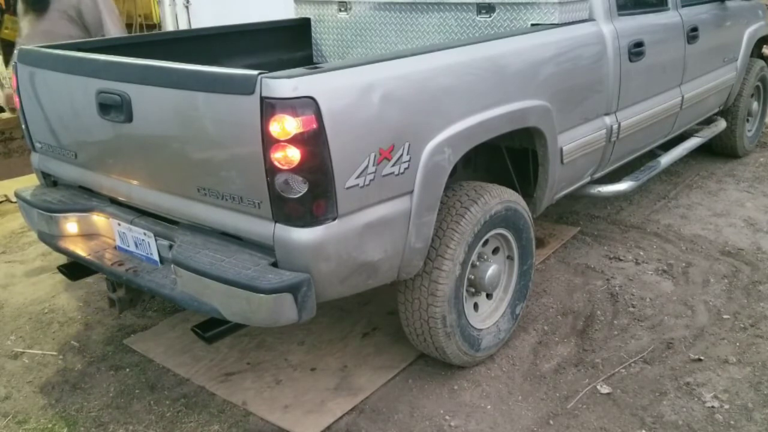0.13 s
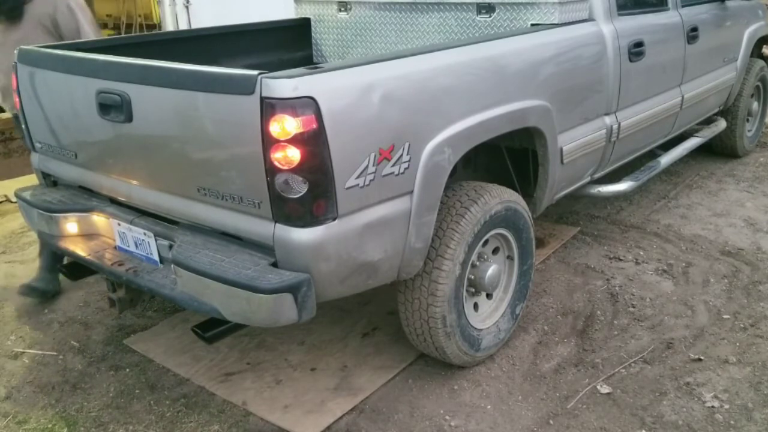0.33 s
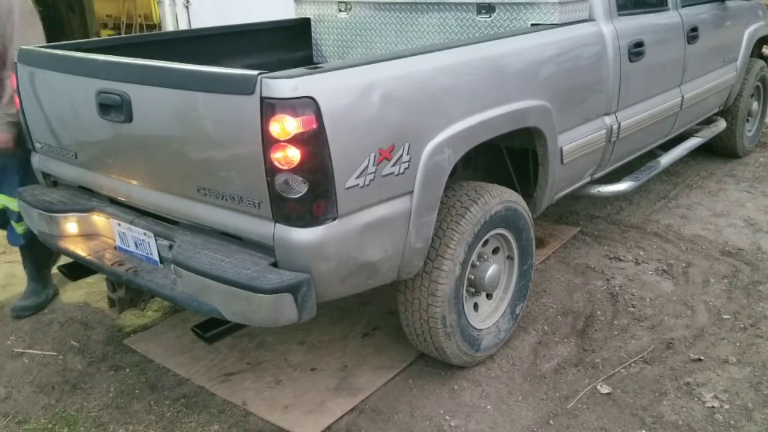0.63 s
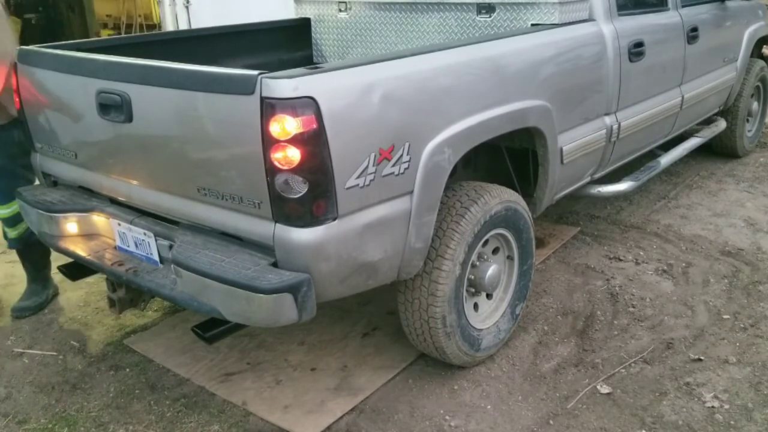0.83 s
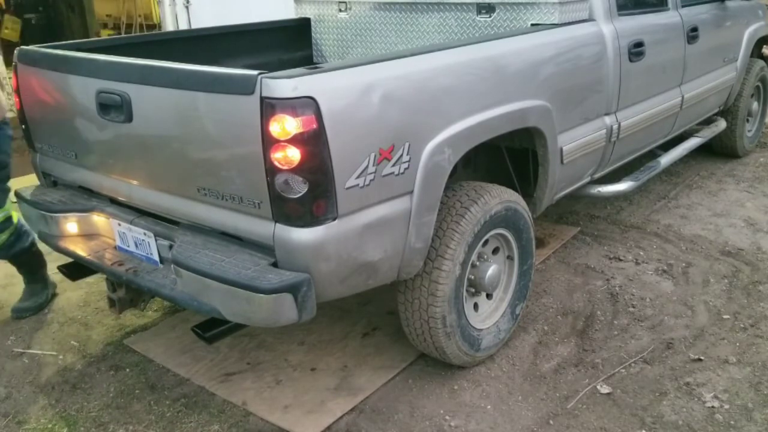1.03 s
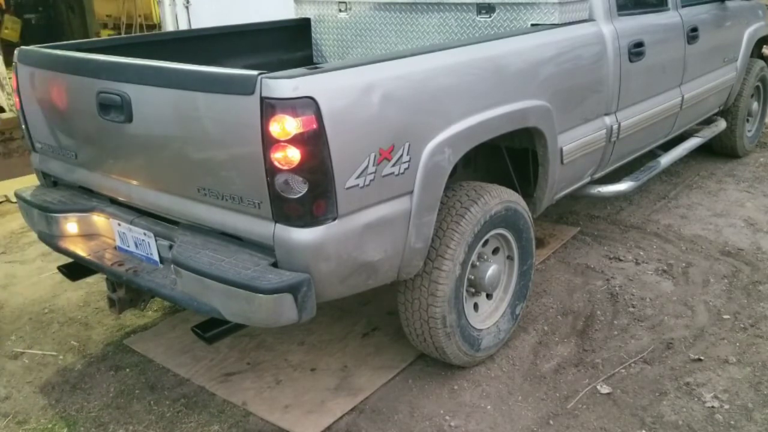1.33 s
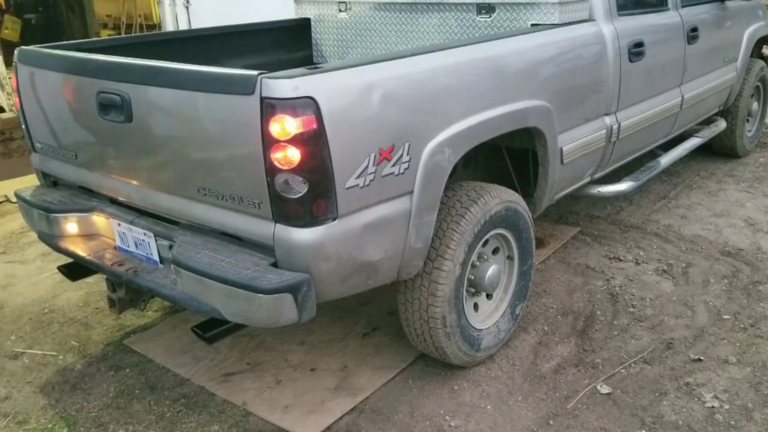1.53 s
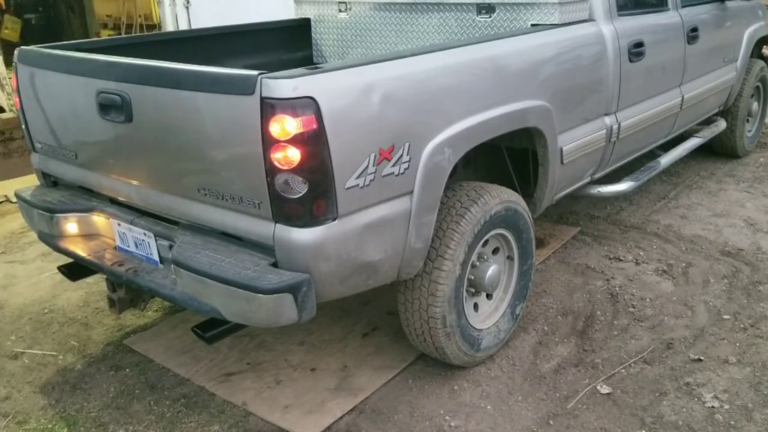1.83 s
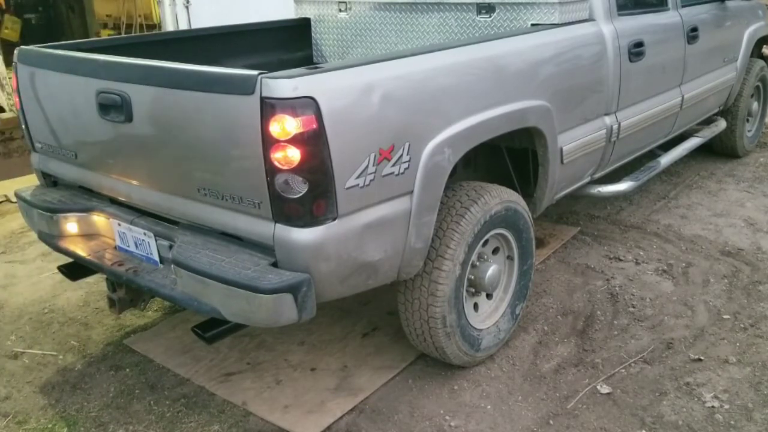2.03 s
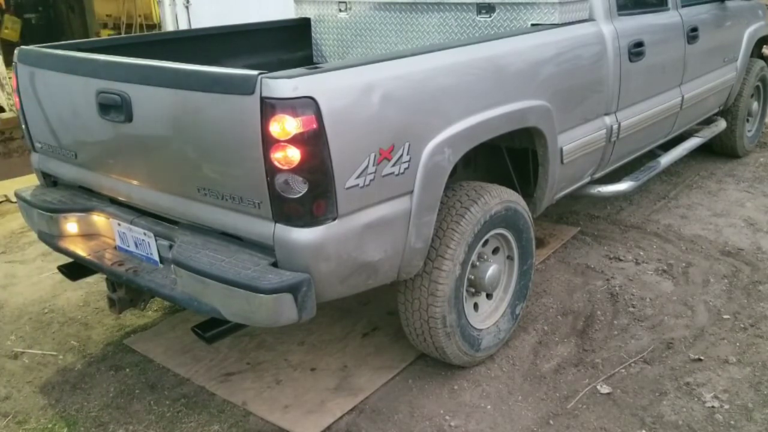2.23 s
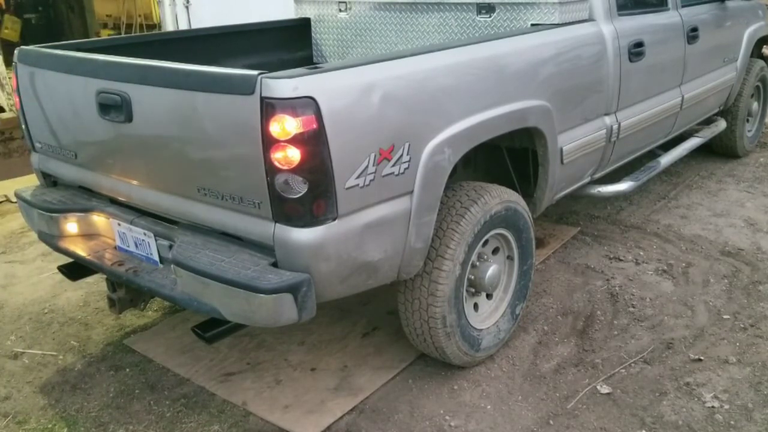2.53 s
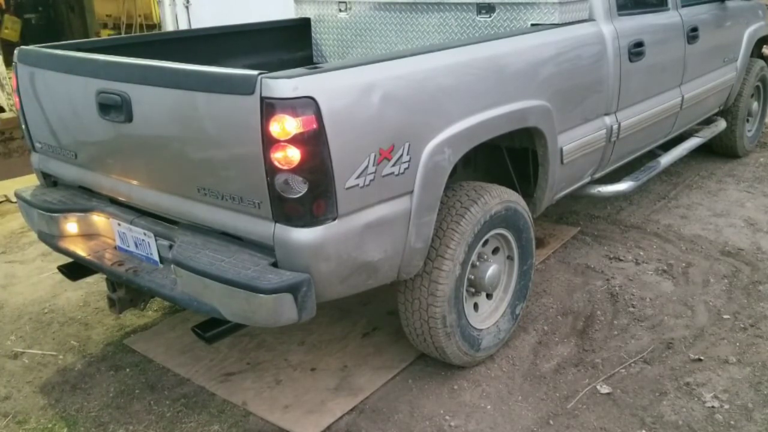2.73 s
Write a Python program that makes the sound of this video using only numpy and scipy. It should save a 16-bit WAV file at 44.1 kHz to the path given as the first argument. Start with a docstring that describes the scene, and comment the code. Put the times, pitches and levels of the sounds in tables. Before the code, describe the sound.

A big petrol pickup engine idles throughout, about 750 turns per minute, its muffled exhaust giving a deep, uneven, bass-heavy throb with soft gas puffs. Faint whir and whine sit to the right. Brief hollow hums rise near 1.4 seconds, and the boom dips momentarily at 1.85. Low air buffets come and go; close cloth rustles faintly at 1.45, then scuffs and ticks on the right around 2.1-2.3.

```python
"""A big petrol V8 idles in a pickup outdoors, heard from beside the rear wheel: uneven pulses from two
cylinder banks excite the resonances of the muffled tailpipe, and each pulse drives a puff of gas noise.
Hollow hums rise briefly from the rumble; the engine bay on the right adds throbbing noise and faint whines.
Swells of low noise are air on the microphone; grains, ticks and a scuff are cloth close by, probably a sleeve."""
import sys
import numpy as np
from scipy import signal
from scipy.fft import rfft, irfft
from scipy.io import wavfile
from scipy.ndimage import map_coordinates

SR = 44100
rng = np.random.default_rng(int(sys.argv[2]) if len(sys.argv) > 2 else 0)


def wav_record(signal):
    """Record a signal, one row per channel, as 16-bit PCM in the file named by sys.argv[1]."""
    frames = np.transpose(np.atleast_2d(signal))
    bounded = np.clip(frames, -1, 1)
    # unit amplitude maps onto the largest positive 16-bit level
    quanta = np.round(bounded * 32767).astype(np.int16)
    wavfile.write(sys.argv[1], SR, quanta)


N = 127890

# Engine speed: [t/s, speed/(rev/min)]
ENGINE_SPEED = [(0, 749), (1.65, 749), (1.8, 746.4), (2.9, 746.4)]
# Bank of each cylinder in firing order: [0 short pipe, 1 long pipe]
CYLINDER_BANK = [0, 1, 0, 1, 1, 0, 1, 0]
# Relative pulse strength of each cylinder in firing order: [level/dB]
CYLINDER_LEVEL = [9.6, 8.1, -8.1, 2.1, -1.3, -2.4, 4.7, -12.7]
# Relative response of muffler and tailpipe: [f/Hz, level/dB]
PIPE_RESPONSE = [(20, -27), (31, -22), (42, -26.4), (50, -.6), (60, -6.2), (68.5, 10.9), (75, -.3),
                 (82, -9.4), (92, -18), (100, 0), (112, -26), (131, -21), (155, -19), (185, -26),
                 (200, -32.9), (213, -10), (238, -38.5), (268, -26), (300, -41), (500, -52), (1000, -72),
                 (3000, -130)]
# Gas noise at the pipe's mouth, before its modulation and swell: [f/Hz, level/(dB per Hz)]
GAS_SPECTRUM = [(18, -76), (35, -62), (52, -61), (72, -65.5), (90, -54), (130, -66), (158, -60.5),
                (185, -76), (213, -59.5), (236, -72.5), (268, -64.5), (305, -69.5), (520, -78),
                (1000, -98.5), (2500, -125)]
# Slow changes of level: [t/s, gas level/dB, engine bay level/dB]
SLOW_SWELL = [(0, -6.5, -0.6), (.25, 1.5, 0), (.45, -3, -1.1), (.7, -0.5, 0.05), (1.1, -.5, 0),
              (1.4, -3.5, .5), (1.7, 1.5, 0), (1.9, 2.5, 0.5), (2.1, 3, -1), (2.35, -3, -0.76),
              (2.7, 1, -0.9), (2.9, 1.5, -1)]
# Hollow hums, level at the peak on the right: [t/s, length/s, f/Hz, level/dB]
HOLLOW_HUMS = [(1.35, .05, 160, -34), (1.421, 0.036, 152, -33)]
# Fan, belts and valve gear before modulation: [f/Hz, left level/(dB per Hz), right level/(dB per Hz)]
BAY_SPECTRUM = [(20, -93.5, -89.5), (62.5, -45, -47.5), (160, -77.5, -67.5), (292, -93, -82),
                (520, -83.5, -73), (925, -83, -72.5), (1610, -97.5, -78.5), (2210, -105, -85),
                (2970, -121, -88.5), (4890, -124, -98), (6370, -130, -97), (8270, -132, -108),
                (10200, -126, -109), (13000, -115, -103), (15400, -116, -108)]
# Moments when the random flutter of the whir's noise happens to be louder: [t/s]
LOUDER_MOMENTS = [.255, .48, .675, 1.32, 1.77, 2.285]
# Whine of pulleys and pumps on the right, before the swell: [f/Hz, level/dB]
PULLEY_WHINES = [(437, -57), (513, -58.5), (2738, -72), (3070, -76)]
# Air on the microphone, level at each peak: [t/s, length/s, left level/dB, right level/dB]
AIR_BUFFETS = [(.375, .012, -50, -28), (1.39, .08, -42, -33), (1.56, .05, -35, -36),
               (1.875, .025, -34, -30), (1.95, .06, -35, -31), (2.13, .08, -35, -31), (2.45, .02, -50, -32),
               (2.66, .06, -42, -34)]
# Relative spectrum of the buffets: [f/Hz, level/dB]
AIR_SPECTRUM = [(20, -67), (60, 6.5), (110, 5.5), (155, 0.5), (185, -12.5), (270, -15), (600, -26),
                (2000, -87), (5000, -110)]
# Level of the rustle before its colouring: [t/s, level/dB]
RUSTLE_LEVEL = [(0, -86), (1.42, -73), (1.455, -50), (1.53, -73), (2.0, -60), (2.04, -47), (2.09, -44.5),
                (2.105, -40.5), (2.14, -40.5), (2.17, -44), (2.21, -48), (2.27, -46.5), (2.33, -59),
                (2.6, -60), (2.7, -50.5), (2.9, -56.5)]
# Filter of the rustle: [f/Hz, left level/dB, right level/dB]
CLOTH_RESPONSE = [(102, 7, 2.5), (253, -7, 8.5), (694, 3, 1), (1490, -11.5, -6), (2970, -41, -7),
                  (5650, -41, -6), (8540, -43, -8.5), (10200, -25, -11), (12200, -22, -4),
                  (15500, -21, -10)]
# Ticks in the cloth, level at onset on the right: [t/s, level/dB, centre f/Hz]
CLOTH_TICKS = [(.1252, -45, 12000), (2.035, -45, 6000), (2.1005, -38, 9000), (2.1037, -35, 12500),
               (2.126, -37, 10000), (2.1355, -39, 7000), (2.1475, -33, 11000), (2.177, -36, 7500),
               (2.194, -44, 12500), (2.2695, -45, 12500), (2.281, -48, 12500), (2.5112, -47, 12000)]
# Relative spectrum of the scuff: [f/Hz, level/dB]
SCUFF_SPECTRUM = [(100, 2), (300, -5), (800, 1.5), (1500, -14), (4000, -23), (9000, -57)]

# Exhaust pulses: timing in s, random spread of strength in dB
FIRST_FIRING_S, BANK_LAG_S, JITTER_S, SCATTER_DB = .0053, .0048, .0001, 0.8
# Gas flow: decay time in s; steady part relative to the rms flow
PUFF_S, PUFF_FLOOR = .012, 1.2
# Boom level outside the stumble; gas on the left relative to the right
EXHAUST_DB, GAS_LEFT_DB = -25, -2.5
# The idle stumbles once: the boom sinks and recovers
STUMBLE_S, STUMBLE_DB, STUMBLE_FALL_S, STUMBLE_RECOVER_S = 1.854, -13, .008, .035
PORT_LAG_S = .00055  # the exhaust reaches the left microphone port this much later
# Relative spread of pitch; left relative to right
HUM_WANDER, HUM_LEFT_DB = .03, -11
WHINE_WANDER, WHINE_LEFT_DB = 0.00387, -14.5
# Modulation of the whir: rms throb and flutter, height and length of the louder moments
BAY_THROB_DB, BAY_FLUTTER_DB, LOUDER_DB, LOUDER_LENGTH_S = 0.42, .5, 1.5, 0.024
FLUTTER_HZ = 14  # random points per second, for the whir's flutter and the pitch of hums and whines
# Cloth: mean grain rate, spread of grain level
GRAINS_PER_S, GRAIN_SPREAD_DB = 9000, 2.5
TICK_DECAY_S, TICK_LEFT_DB = .0009, -20
SCUFF_S, SCUFF_LENGTH_S, SCUFF_DB, SCUFF_LEFT_DB = 2.102, 0.012, -36, -20
TOP_HZ = 15750  # edge of the recorder's passband


def firings():
    """Periodic excitation: eight pulses per two turns, one bank delayed, from a second before the start."""
    t = np.arange(-SR, N) / SR
    firings_per_s = curve(ENGINE_SPEED, t) / 15  # four firings per turn, 60 s per minute
    fired = np.cumsum(firings_per_s) / SR
    fired -= np.interp(FIRST_FIRING_S, t, fired)
    count = np.arange(np.ceil(fired[0]), fired[-1]).astype(int)
    cylinder = count % len(CYLINDER_BANK)
    chance = rng.standard_normal((len(count), 2))
    bank_delay = BANK_LAG_S * np.array(CYLINDER_BANK)[cylinder]
    when = np.interp(count, fired, t) + bank_delay + JITTER_S * chance[:, 0]
    strength = undb(np.array(CYLINDER_LEVEL)[cylinder] + SCATTER_DB * chance[:, 1])
    return np.bincount(np.searchsorted(t, when), strength, len(t) + 1)[:len(t)]


def puffs(pulses):
    """Exponential relaxation: the gas flow jumps at each firing and dies away."""
    return unit(signal.lfilter([1], [1, -np.exp(-1 / (PUFF_S * SR))], pulses))


def exhaust(pulses, flow):
    """Resonance and flow noise: pulses boom in the pipe, and noise follows the gas flow out of it."""
    t = np.arange(N) / SR
    since = t - STUMBLE_S
    sink = np.exp(-np.abs(since) / np.where(since < 0, STUMBLE_FALL_S, STUMBLE_RECOVER_S))
    resonance = unit(colour(pulses, PIPE_RESPONSE)[-N:])
    boom = -undb(EXHAUST_DB + STUMBLE_DB * sink) * resonance
    rush = hiss(len(flow)) * unit(flow + PUFF_FLOOR)
    gas = swell(channels=1) * colour(rush, GAS_SPECTRUM)[-N:]
    left = np.interp(t - PORT_LAG_S, t, boom + undb(GAS_LEFT_DB) * gas)
    return np.array([left, boom + gas])


def hums():
    """Frequency-modulated sines under brief envelopes: hollow hums of wavering pitch in the rumble."""
    total = 0
    for at, length, hz, db in HOLLOW_HUMS:
        total = total + undb(db) * bump(at, length) * wavering_tone(hz, HUM_WANDER)
    return np.outer([undb(HUM_LEFT_DB), 1], total)


def engine_bay(flow):
    """Amplitude modulation: whir throbs with the gas flow and flutters, beside wavering whines."""
    throb_db = BAY_THROB_DB * unit(flow[-N:] - flow[-N:].mean())
    louder_db = LOUDER_DB * sum(bump(at, LOUDER_LENGTH_S) for at in LOUDER_MOMENTS)
    flutter_db = BAY_FLUTTER_DB * walk(FLUTTER_HZ) + louder_db
    gain = undb(throb_db + flutter_db)
    whir = np.array([colour(hiss(N) * gain, BAY_SPECTRUM, channels=side) for side in (1, 2)])
    whine = sum(undb(db) * wavering_tone(hz, WHINE_WANDER) for hz, db in PULLEY_WHINES)
    return whir + np.outer([undb(WHINE_LEFT_DB), 1], whine)


def swell(channels):
    """Slow amplitude modulation: gain of the gas (column 1) or the engine bay (column 2)."""
    return undb(curve(np.array(SLOW_SWELL)[:, [0, channels]], np.arange(N) / SR))


def buffets():
    """Incoherent low-frequency noise: soft swells of air, unrelated on the two microphone ports."""
    push = 0
    for at, length, left_db, right_db in AIR_BUFFETS:
        push = push + np.outer(undb([left_db, right_db]), bump(at, length))
    return push * np.array([unit(colour(hiss(N), AIR_SPECTRUM)) for _ in range(2)])


def slips():
    """Random impulse process: tiny slips of cloth at random moments, of random sign and size."""
    happens = rng.random(N) < GRAINS_PER_S / SR
    return happens * rng.standard_normal(N) * undb(GRAIN_SPREAD_DB * rng.standard_normal(N))


def rustle():
    """Friction noise: dense slips, filtered and unrelated on the two microphone ports."""
    rub = undb(curve(RUSTLE_LEVEL, np.arange(N) / SR))
    return np.array([colour(rub * unit(slips()), CLOTH_RESPONSE, channels=side) for side in (1, 2)])


def ticks():
    """Sudden release: cloth catches and snaps free in decaying band noise, each tick at its own frequency."""
    t, total = np.arange(N) / SR, 0
    for at, db, hz in CLOTH_TICKS:
        snap = unit(signal.lfilter(*signal.iirpeak(hz, 2, fs=SR), hiss(N)))
        decay = (t >= at) * np.exp(-np.abs(t - at) / TICK_DECAY_S)
        total = total + undb(db) * decay * snap
    return np.outer([undb(TICK_LEFT_DB), 1], total)


def scuff():
    """Friction noise under a short envelope: a brief, light scuff as the cloth touches."""
    noise = unit(colour(hiss(N), SCUFF_SPECTRUM))
    return np.outer([undb(SCUFF_LEFT_DB), 1], undb(SCUFF_DB) * bump(SCUFF_S, SCUFF_LENGTH_S) * noise)


def wavering_tone(hz, wander):
    """Frequency modulation: a sine of rms 1 whose phase sums a randomly wandering frequency."""
    frequency = hz * (1 + wander * walk(FLUTTER_HZ))
    return unit(np.sin(2 * np.pi * np.cumsum(frequency) / SR))


def colour(x, rows, channels=1):
    """Minimum-phase filtering through (f/Hz, level/dB, ..) rows; channels picks the level column."""
    rows, size = np.array(rows, float), 2 ** 18
    hz = np.maximum(np.arange(size // 2 + 1) * SR / size, 1)
    level_db = np.interp(np.log(hz), np.log(rows[:, 0]), rows[:, channels])
    cepstrum = irfft(np.log(undb(level_db)))
    # folding the cepstrum onto positive times makes the filter causal
    cepstrum[1:size // 2] *= 2
    cepstrum[size // 2 + 1:] = 0
    return irfft(rfft(x, size) * np.exp(rfft(cepstrum)))[:len(x)]


def hiss(count):
    """White noise: uniform power density of 0 dB per Hz."""
    return rng.standard_normal(count) * np.sqrt(SR / 2)


def walk(hz):
    """Band-limited randomness: smooth wander of rms 1 through hz random points per second."""
    points = rng.standard_normal(1024)
    return unit(map_coordinates(points, [np.arange(N) / SR * hz], mode="wrap"))


def bump(at, length):
    """Gaussian envelope: height 1 at a moment (s), falling to exp(-2) at one length (s) away."""
    return np.exp(-2 * ((np.arange(N) / SR - at) / length) ** 2)


def curve(rows, t):
    """Linear interpolation through (t/s, value) rows."""
    return np.interp(t, *np.array(rows).T)


def unit(x):
    """Normalisation to rms 1."""
    return x / np.sqrt(np.mean(x ** 2))


def undb(db):
    """Logarithmic level: decibels to amplitude gain."""
    return 10 ** (np.asarray(db) / 20)


def scene():
    """Superposition: exhaust in the middle, engine bay and rustle to the right."""
    pulses = firings()
    flow = puffs(pulses)
    engine = exhaust(pulses, flow) + hums() + swell(channels=2) * engine_bay(flow)
    cloth = rustle() + ticks() + scuff()
    return engine + buffets() + cloth


def record(dry):
    """Low-pass filtering: the recorder cuts the top of the treble."""
    return signal.sosfilt(signal.ellip(10, .1, 80, TOP_HZ, fs=SR, output="sos"), dry)


dry = scene()
out = record(dry)
wav_record(out)
```